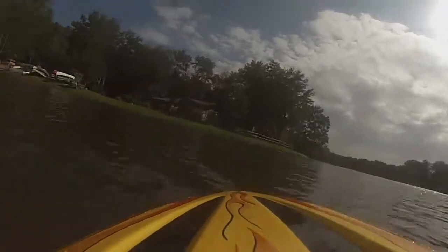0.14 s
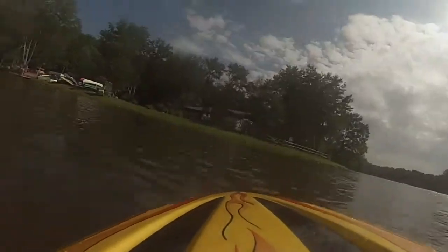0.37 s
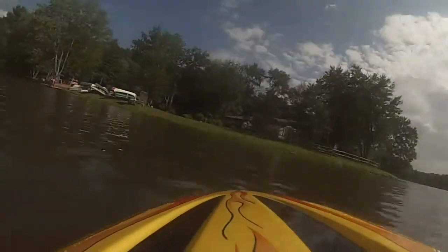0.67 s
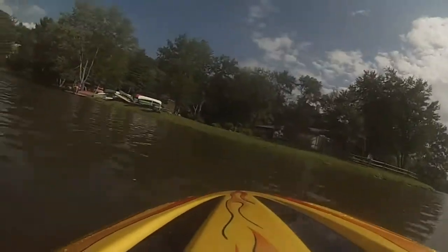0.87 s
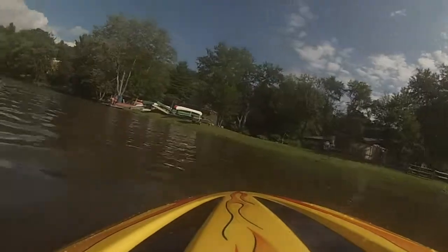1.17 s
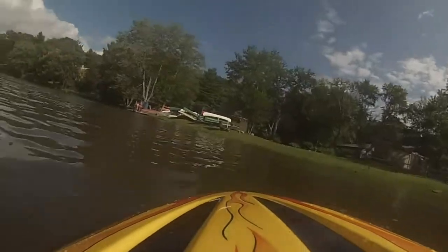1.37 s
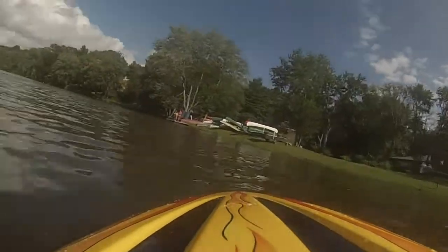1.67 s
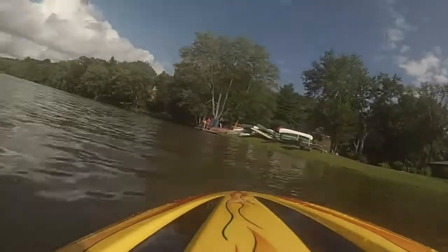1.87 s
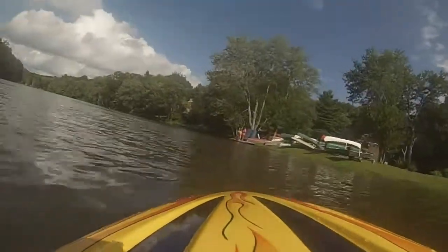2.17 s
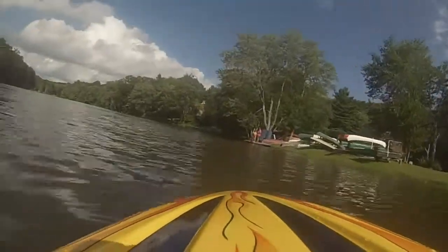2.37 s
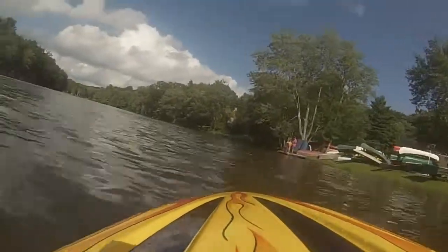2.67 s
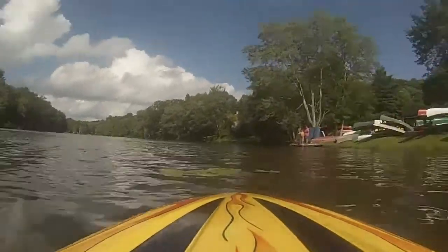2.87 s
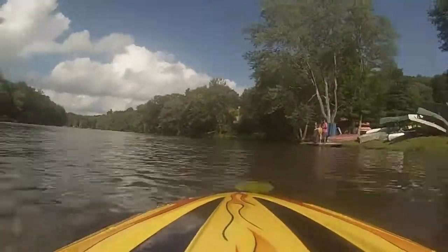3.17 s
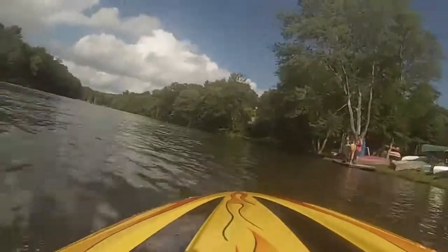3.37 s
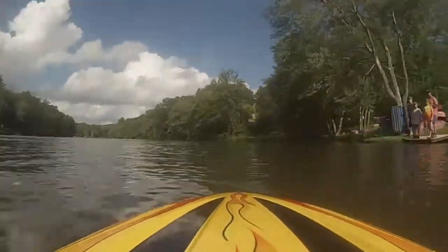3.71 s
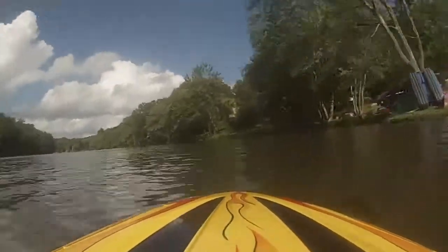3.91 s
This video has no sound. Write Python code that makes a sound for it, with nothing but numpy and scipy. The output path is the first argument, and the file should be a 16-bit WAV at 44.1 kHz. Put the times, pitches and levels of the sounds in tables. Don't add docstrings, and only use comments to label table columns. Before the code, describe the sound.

Heard from a cased camera on a small model boat's deck, an electric motor hums low and rough, its drive cable beating against it. Water rushes along the hull, wavelets slap and ripples thud. Before three seconds the pitch leaps upward into a harder, buzzing whine with a louder case rattle, dipping briefly as the hull lifts.

```python
import sys
import numpy as np
from scipy import signal
from scipy.io import wavfile
from scipy.ndimage import uniform_filter1d

SR = 44100
rng = np.random.default_rng(int(sys.argv[2]) if len(sys.argv) > 2 else 0)


def invert_db(x):
    u = np.asarray(x, float) / 20
    return 10 ** u


def store_wav(level_fs):
    pcm = np.round(np.clip(np.atleast_2d(level_fs), -1, 1) * 32767)
    wavfile.write(sys.argv[1], SR, pcm.T.astype(np.int16))


N = 178398

# time in seconds, turns in Hz.
SHAFT_HZ = [(0.0, 267.8), (0.2, 260.5), (0.5, 267.8), (1.6, 273.7), (1.85, 267), (2.2, 272.4),
            (2.42, 264.5), (2.685, 274), (2.73, 322), (2.81, 383.7), (2.895, 440.3), (3.03, 427),
            (3.2, 423.4), (3.35, 430.1), (3.44, 425.4), (3.56, 438), (3.66, 426.8), (4.04, 442.6)]
# time in seconds, whirl in Hz.
WHIRL_HZ = [(0.0, 165.2), (0.21, 143.2), (0.6, 161), (1.3, 162.2), (1.6, 156.2), (2.0, 140.1), (2.28, 151),
            (2.5, 133.1), (2.67, 149.9), (2.78, 224.4), (2.9, 300.3), (2.96, 301.4), (3.02, 288)]
# middle in seconds, rise in % of speed, length in ms.
HOPS = [
    (2.899, 1.22, 20.4),
    (3.352, 4.05, 25.5),
    (3.552, 1.3, 22),
    (3.832, 1.47, 14.9),
    (3.9, 0.68, 55),
]
# time in seconds, lift of the overtones in dB.
LOAD_DB = [(0, -0.5), (.15, -2.5), (.8, -0.5), (1.1, 2.5), (1.7, 3), (1.8, 0), (2.2, -0.9), (2.7, -1),
           (2.74, 6.5), (2.79, -1), (2.98, -8.5), (3.04, -2), (3.35, -2), (3.5, -0.5), (3.62, 1.5),
           (3.75, 5), (3.86, -3), (4.0, 6.5)]
# start in seconds, depth in dB, length in ms.
SLACKS = [(0.226, 10, 73), (0.435, 20, 35), (0.496, 24, 29), (0.576, 23, 35), (0.68, 26, 53),
          (0.765, 20, 39), (0.891, -0.5, 70), (1.03, 16, 78), (1.25, 7, 120), (1.486, 14, 92),
          (1.655, 12, 99), (1.891, 15, 45), (2.04, 8, 27), (2.132, 9, 51), (2.686, 2, 30), (2.755, 6.5, 27),
          (2.902, 11, 45), (2.989, 8, 57.5), (3.069, 9.5, 33), (3.126, 6, 55), (3.198, 10.5, 89),
          (3.343, 25, 146), (3.548, 25, 138), (3.63, 10, 182), (3.828, 32, 64), (3.87, 8, 81),
          (3.929, 14, 170)]
# cruising level in dB, full throttle level in dB, share of load, share of slack.
OVERTONES = [
    (-26.5, -22.5, 0.67, 0.23),
    (-30.5, -21.5, 0.98, 0.12),
    (-29, -26.5, 0.8, 0.37),
]
# centre in Hz, width in Hz, lift in dB.
SWEPT_MODES = [(673, 45, 11), (960, 15, 13), (1127.3, 31, 16.5)]
# shaft multiple, whirl multiple, free level in dB, locked level in dB.
MIXES = [(0, 1, -25.5, -28), (1, -1, -46.5, -29), (1, 1, -41.5, -33), (2, 1, -35.5, -23),
         (3, -1, -61, -34.5), (3, 1, -65, -34), (4, -1, -50.5, -31), (4, 1, -50, -35.5),
         (5, -1, -33.5, -35.5), (5, 0, -57, -29.5), (6, -1, -47.5, -66), (6, 0, -52, -37),
         (6, 1, -62, -44.5), (7, 1, -56, -71), (8, 0, -59, -49.5)]
# time in seconds, level in dB.
RUSH_DB = [(0.0, -19.5), (0.84, -18.5), (1.29, -19.5), (1.59, -17.5), (2.52, -20.5), (3.04, -18.5),
           (4.04, -18.5)]
# frequency in Hz, density in dB per Hz.
HULL_SLOW = [(60, -85), (100, -45), (210, -43.5), (270, -28.5), (340, -43.5), (480, -50.5), (750, -41.5),
             (1000, -54), (1130, -36.5), (1380, -37.5), (1600, -48), (1880, -42.5), (2400, -51),
             (3800, -63.5), (4200, -78.5)]
# frequency in Hz, density in dB per Hz.
HULL_FAST = [(60, -100), (100, -59), (210, -46), (320, -42.5), (480, -49.5), (620, -50.5), (1000, -49.5),
             (1330, -38), (1600, -55.5), (1800, -44), (2900, -53.5), (3300, -66.5), (3650, -63),
             (3950, -72), (4250, -85)]
# frequency in Hz, density in dB per Hz.
SPRAY = [(3900, -10), (4300, 2.5), (4700, 4), (5000, -0.5), (5700, -4.5), (6400, -9), (7500, -16.5),
         (9500, -34.5)]
# time in seconds, peak in dB, length in ms.
SLAPS = [(0.024, -0.5, 22.6), (0.232, -2, 11.5), (0.323, -3, 15), (0.3445, 1.5, 14.7), (0.446, -5.5, 37),
         (0.4842, -0.5, 33.5), (0.5406, -3, 14), (0.5746, -8, 14), (0.6502, -4, 26), (0.748, 0, 5.3),
         (0.787, -6, 18), (0.876, 0, 26), (1.004, -3, 26), (1.0588, -4.5, 32), (1.271, -0.5, 25),
         (1.481, -5, 22), (1.6246, -7, 15), (1.694, 3.5, 29.5), (1.749, -0.5, 29), (1.7902, -5, 29),
         (1.9624, -0.5, 21), (2.121, 0.5, 30), (2.177, 2.5, 22.3), (2.249, -10, 15), (2.416, -4, 61),
         (2.796, -14, 13), (2.8707, -5, 34), (2.9339, -3.5, 48), (3.331, -5, 35), (0.107, -13, 22)]
# centre in Hz, width in Hz, level in dB.
PANELS = [(1212, 155, 3.5), (1314, 124, 3.5), (1834, 193, -2), (2800, 280, -18.5), (4020, 37, -20.5),
          (4380, 1800, -36)]
# frequency in Hz, density in dB per Hz.
CASE = [(3600, -43), (4300, -9), (5800, 1), (6300, -4), (6800, 4.5), (7900, 2), (8400, -6.5), (8800, -2.5),
        (9500, -16.5), (10300, -10.5), (11200, -20), (12100, -16), (14000, -22), (15000, -40.5)]
# frequency in Hz, density in dB per Hz.
HATCH = [(2900, -13), (3300, -16), (3650, -8.5), (3950, -15), (4300, -35)]
# middle in seconds, lift in dB, half length in ms.
BUMPS = [(0.05, 11, 50), (0.27, 9.3, 70), (0.57, 15, 51), (0.69, 7, 30), (0.9, 5.3, 60), (1.85, 3.2, 50),
         (1.98, 13, 40), (2.09, 9.7, 25), (2.16, 13, 29.92), (2.42, 5, 50), (3.44, 8, 70), (3.75, 4.9, 70),
         (3.89, 5.1, 40), (4.04, 12, 49.42)]
# frequency in Hz, density in dB per Hz.
THUD = [(7.1, -35.5), (12, -5), (43, -4), (107, -11.5), (120, -17.5), (160, -28.5), (260, -120)]

SHAKE_DB = (-18, -14)
RATTLE_DB, RATTLE_SLACK_DB, RATTLE_FITS_DB = (-49.5, -46), (1.4, 14), (1.72, 1)


def seconds():
    return np.arange(N) / SR


def evened(x):
    return x / np.sqrt(np.mean(x ** 2) + 1e-20)


def between(pair, share):
    return pair[0] + (pair[1] - pair[0]) * share


def bell(x, middle, width):
    return np.exp(-.5 * ((x - middle) / width) ** 2)


def curve(rows):
    s, value = np.transpose(rows)
    return np.interp(seconds(), s, value)


def coloured(x, points):
    f, db = np.transpose(points)
    hz = abs(np.fft.fftfreq(8192, 1 / SR))
    gain_db = np.interp(np.log(hz + 1), np.log(f + 1), db - db.max(), left=-95, right=-95)
    spectrum = np.exp(np.conj(signal.hilbert(np.log(invert_db(gain_db)))))
    taps = np.fft.ifft(spectrum).real[:4096]
    return evened(signal.oaconvolve(x, taps)[:N])


def wander(hz, count=1):
    control_sr = SR / 64
    slow = rng.standard_normal((N // 64 + 2, count))
    slow = signal.lfilter(*signal.butter(1, [hz / 8, hz], "band", fs=control_sr), slow, axis=0)
    slow = signal.lfilter(*signal.butter(2, 1.5 * hz, fs=control_sr), slow, axis=0)
    at = np.arange(N) / 64
    return np.array([np.interp(at, np.arange(len(s)), evened(s)) for s in slow.T])


def throttle():
    t, shaft_hz = seconds(), curve(SHAFT_HZ)
    whirl_hz = np.where(t < WHIRL_HZ[-1][0], curve(WHIRL_HZ), shaft_hz * 2 / 3)
    race = 1 + sum(rise / 100 * bell(t, s, ms / 1000) for s, rise, ms in HOPS)
    race = race + .002 * wander(16.1)[0]
    full = np.clip((shaft_hz - 280) / 140, 0, 1)
    shaft = 2 * np.pi * np.cumsum(shaft_hz * race) / SR
    whirl = 2 * np.pi * np.cumsum(whirl_hz * race) / SR
    return shaft, whirl, full


def slack():
    t, skew = seconds(), 0.65
    return -sum(db * np.sin(np.pi * np.clip((t - s) * 1000 / ms, 0, 1) ** skew) ** 2 for s, db, ms in SLACKS)


def shake(shaft, full):
    sway = wander(40.0, count=2)
    return invert_db(between(SHAKE_DB, full) + slack() + 1.2 * sway[0]) * np.cos(shaft + 0.25 * sway[1])


def overtones(shaft, full):
    load_db, slack_db, tones = curve(LOAD_DB), slack(), np.zeros(N)
    surge = np.clip(8 * full * (1 - full), 0, 1)
    for multiple, (slow_db, fast_db, loaded, slackened) in enumerate(OVERTONES, 2):
        sway = wander(27.0, count=2)
        hz = multiple * np.gradient(shaft) * SR / (2 * np.pi)
        mode_db = sum(db * bell(hz, f, width) for f, width, db in SWEPT_MODES) - 4.0
        level_db = between((slow_db, fast_db), full) + loaded * load_db + slackened * slack_db
        level_db = level_db + surge * mode_db + (2.5 - 0.74 * surge) * sway[0]
        jitter = (0.3 - .2 * surge) * sway[1]
        tones += invert_db(level_db) * np.cos(multiple * shaft + jitter + 2 * np.pi * rng.random())
    return tones


def whine(shaft):
    t, on_s, off_s = seconds(), 3.0, 3.21
    gate = np.clip(np.minimum(t - on_s, off_s - t) / .03, 0, 1)
    level_db = -49 + 30 * np.minimum(t - off_s, 0)
    return gate * invert_db(level_db) * np.cos(10 * shaft + .15 * wander(27.0)[0])


def mixes(shaft, whirl, full):
    locked = np.clip((np.gradient(whirl) / np.gradient(shaft) - .62) / .04, 0, 1)
    load_db, slack_db, lines = curve(LOAD_DB), slack(), np.zeros(N)
    for k, m, free_db, locked_db in MIXES:
        sway = wander(6.4, count=2)
        if k > 2:
            drive_db, sway_db = 0.25 * k * load_db + 0.11 * slack_db, 2.8
        else:
            drive_db, sway_db = 0.33 * full * slack_db, 1.3
        level_db = between((free_db, locked_db), locked) + drive_db + sway_db * sway[0]
        angle = round(k) * shaft + round(m) * whirl + 0.45 * sway[1] + 2 * np.pi * rng.random()
        lines += invert_db(level_db) * np.cos(angle)
    return lines


def motor(shaft, whirl, full):
    hum = shake(shaft, full) + overtones(shaft, full) + whine(shaft) + mixes(shaft, whirl, full)
    return np.sqrt(2) * hum


def rattle_db(full):
    lost = np.tanh(uniform_filter1d(slack(), size=1500) / 14)
    load_db = 0.58 * (1 - full) * np.minimum(curve(LOAD_DB), 3.5)
    return between(RATTLE_DB, full) + between(RATTLE_SLACK_DB, full) * lost + load_db


def rush(shaft, full):
    gusts_db = 1.6 * wander(21.0)[0]
    flow = rng.standard_normal(N) * invert_db(gusts_db) * (1 + 0.33 * np.cos(shaft))
    water = (1 - full) * coloured(flow, HULL_SLOW) + full * invert_db(-3.5) * coloured(flow, HULL_FAST)
    spray_db = -57 + 0.5 * full * (rattle_db(full) + 64.5)
    return invert_db(curve(RUSH_DB) + 1.0) * water + invert_db(spray_db) * coloured(flow, SPRAY)


def rattle(shaft, full):
    turns = shaft / (2 * np.pi)
    force = invert_db(3.7 * np.clip(rng.standard_normal(N // 64), -3, 1.8))[turns.astype(int)]
    strikes = 0.18 + force * np.exp(-(turns % 1) / 0.22)
    strikes *= invert_db(2.75 * np.minimum(wander(70.)[0], 1.2)) * rng.standard_normal(N)
    panels = coloured(strikes, CASE) + full * invert_db(9.5) * coloured(strikes, HATCH)
    treble = signal.lfilter(*signal.butter(2, 9300, "high", fs=SR), panels)
    panels += full * (2.46 * invert_db(0.69 * slack()) - .8) * treble
    fits_db = between(RATTLE_FITS_DB, full) * wander(26.0)[0]
    return invert_db(rattle_db(full) + fits_db + 2.0) * panels


def bumps():
    t = seconds()
    lift_db = sum(db * bell(t, s, ms / 1000) for s, db, ms in BUMPS)
    return invert_db(-33.5 + lift_db + 2.9 * wander(10.0)[0]) * coloured(rng.standard_normal(N), THUD)


def slaps():
    burst, ring, t = np.zeros(N), np.zeros(N), seconds()
    for s, peak_db, ms in SLAPS:
        u = np.maximum(t - s + .003, 0) * 1000 / np.clip(ms, 6, 40)
        burst += invert_db(peak_db) * np.sin(np.pi * np.minimum(u, 1) ** 0.82) ** 1.32
    splash = rng.standard_normal(N)
    for hz, width, db in PANELS:
        band = signal.butter(2, [hz - width / 2, hz + width / 2], "band", fs=SR)
        ring += invert_db(db) * signal.lfilter(*band, splash)
    ring /= np.sqrt(uniform_filter1d(ring ** 2, size=500) + 1e-9)
    return invert_db(-11.5) * burst * ring


def scene():
    shaft, whirl, full = throttle()
    drive = motor(shaft, whirl, full)
    water = rush(shaft, full) + slaps()
    return (drive + water + rattle(shaft, full) + bumps())[None]


def roll_off(x):
    return signal.sosfilt(signal.butter(12, 15440, fs=SR, output="sos"), x)


def record(dry):
    fade = np.minimum((N - np.arange(N)) / 150, 1)
    limited = 1.138 * np.tanh(dry / 1.185)
    return roll_off(limited * fade)


dry = scene()
out = record(dry)
store_wav(out)
```